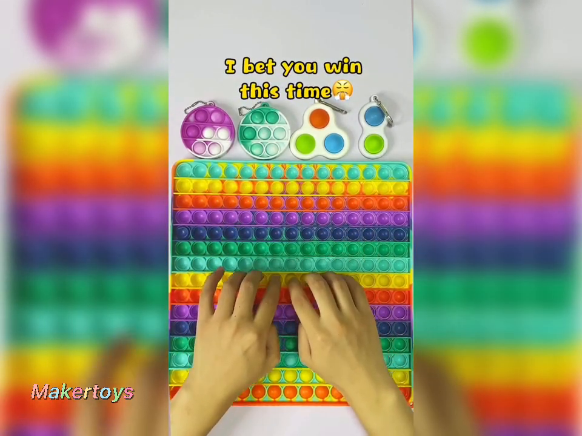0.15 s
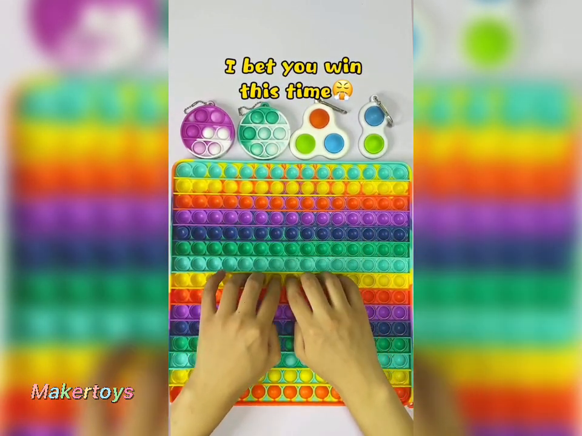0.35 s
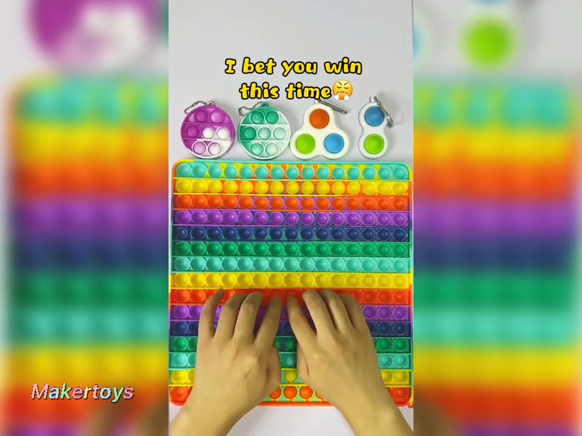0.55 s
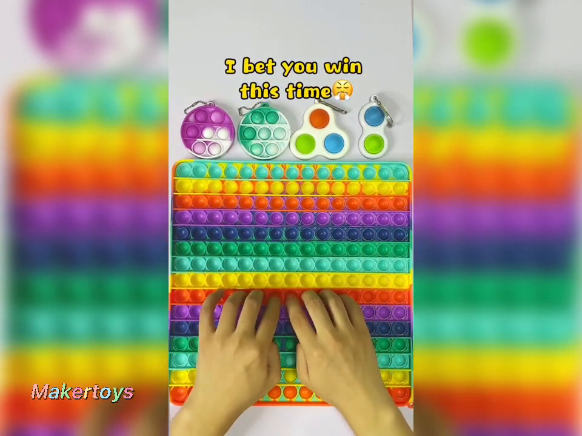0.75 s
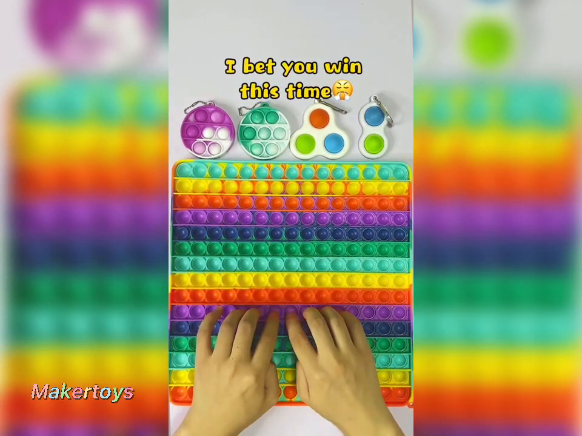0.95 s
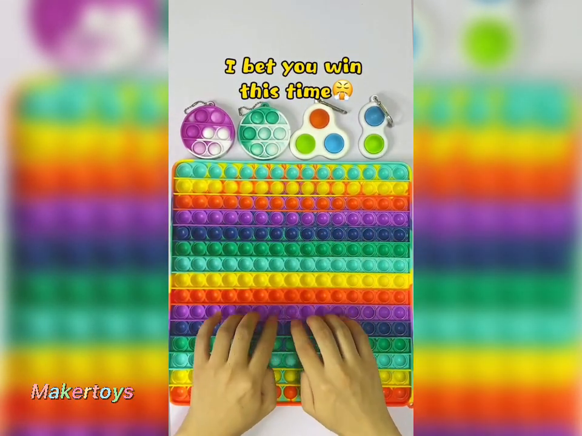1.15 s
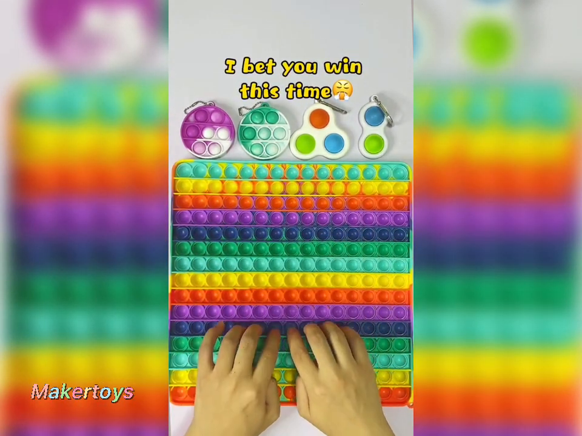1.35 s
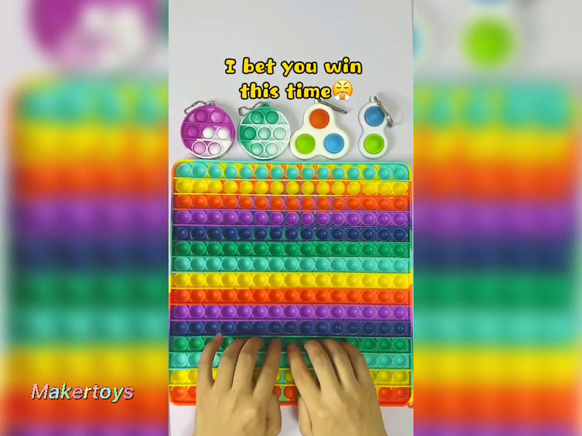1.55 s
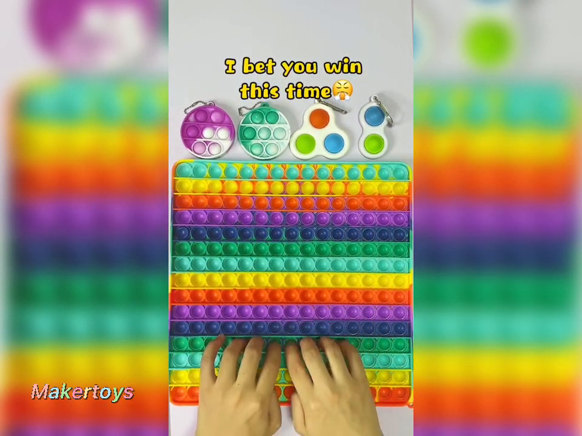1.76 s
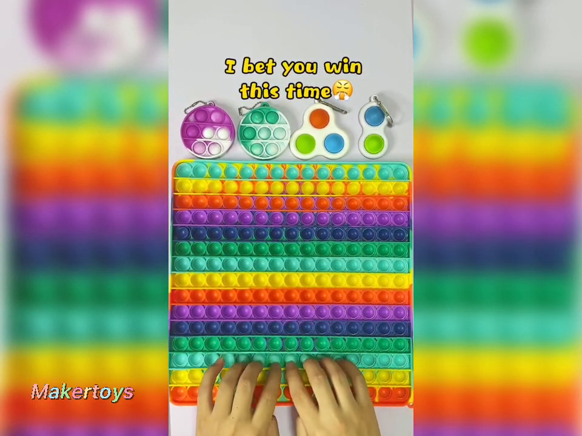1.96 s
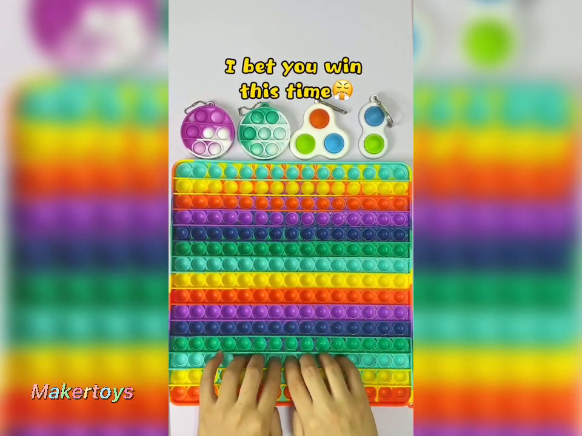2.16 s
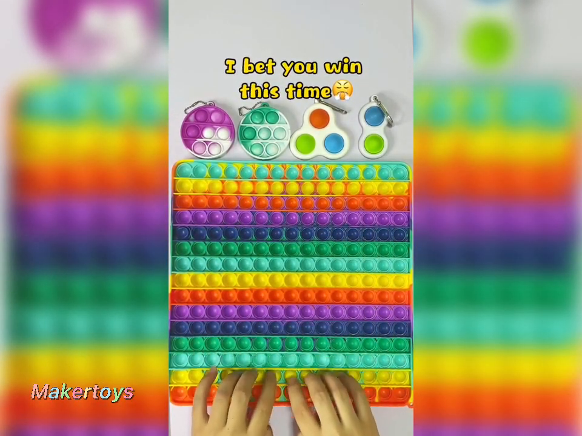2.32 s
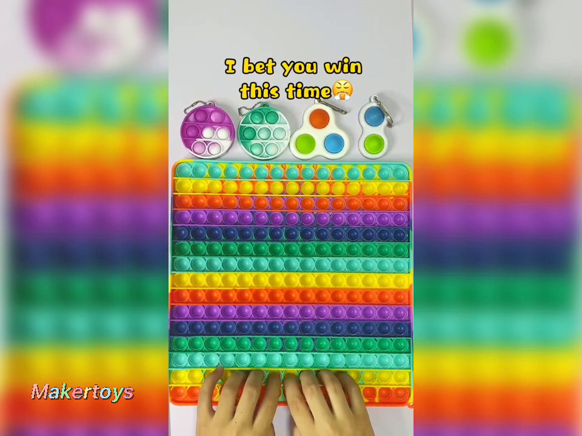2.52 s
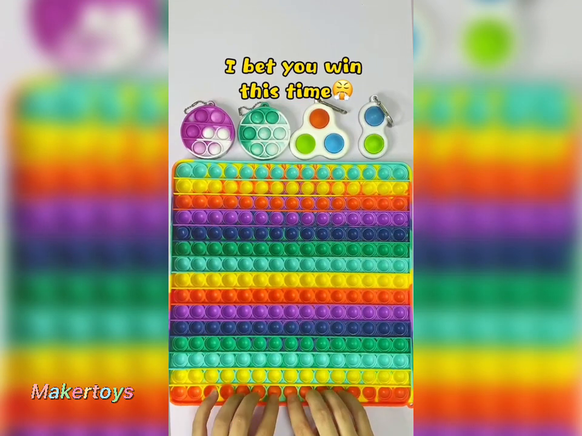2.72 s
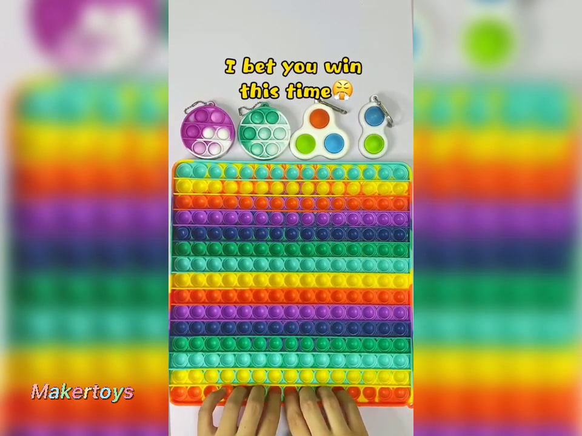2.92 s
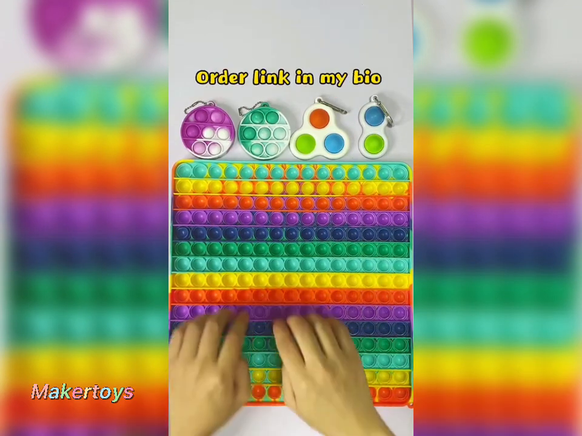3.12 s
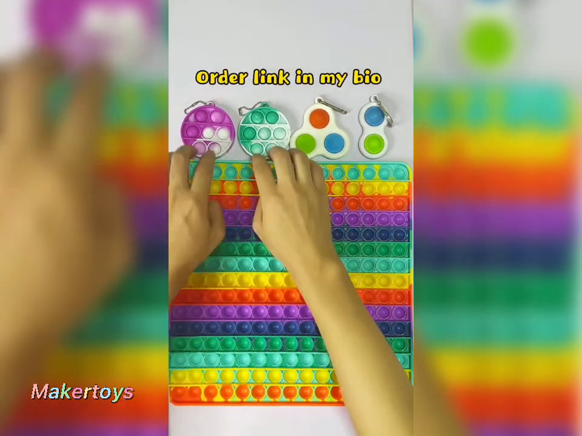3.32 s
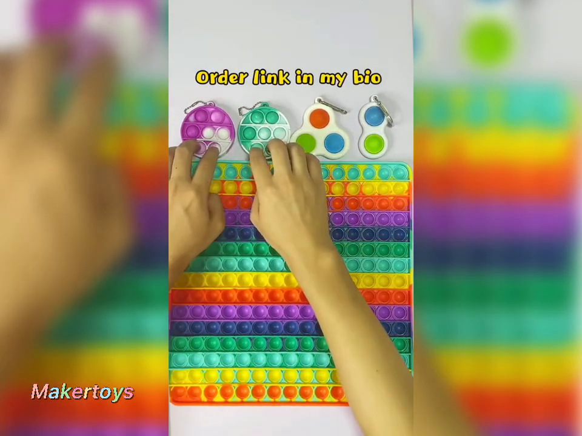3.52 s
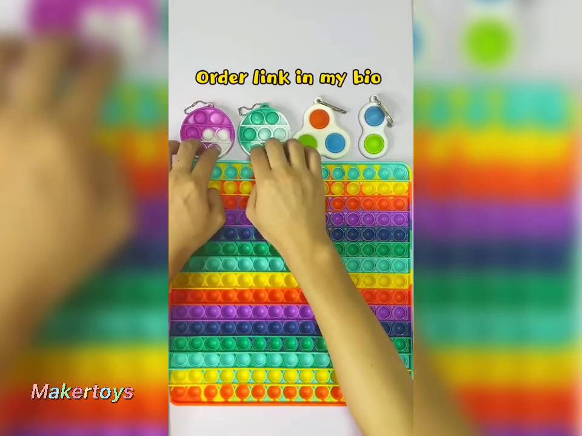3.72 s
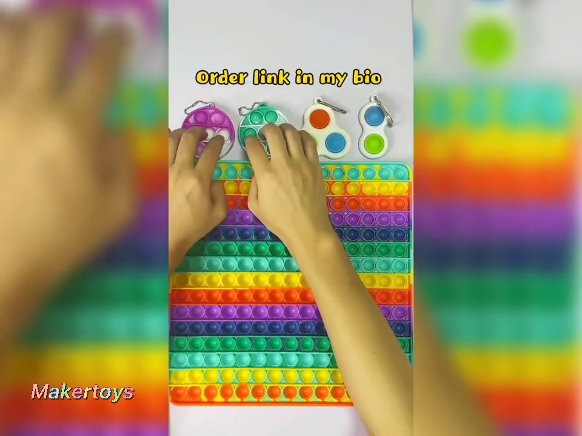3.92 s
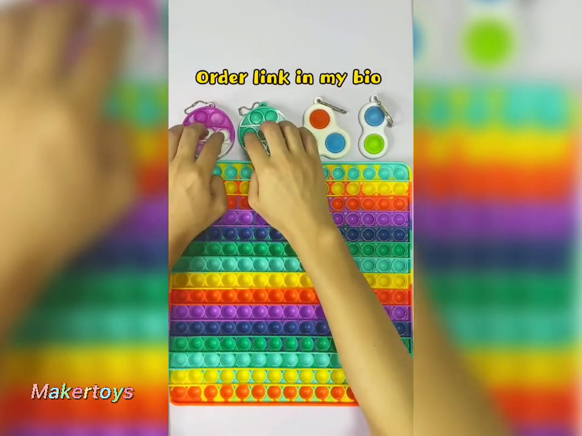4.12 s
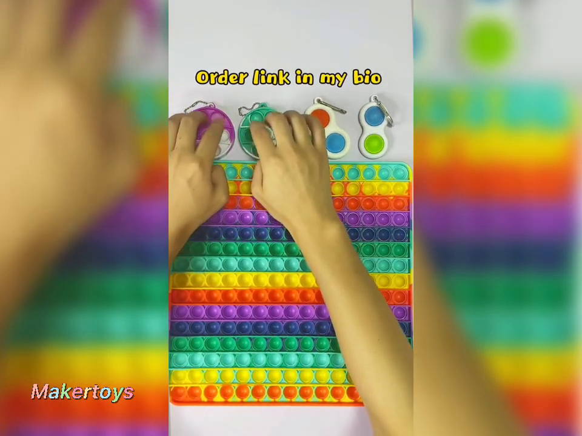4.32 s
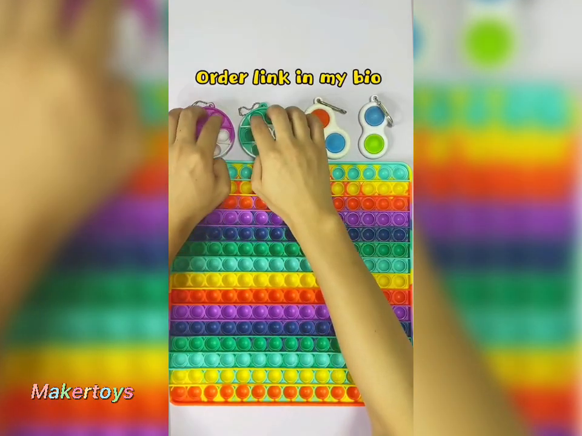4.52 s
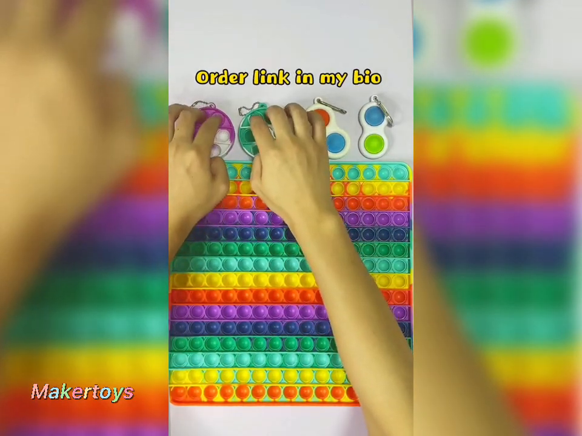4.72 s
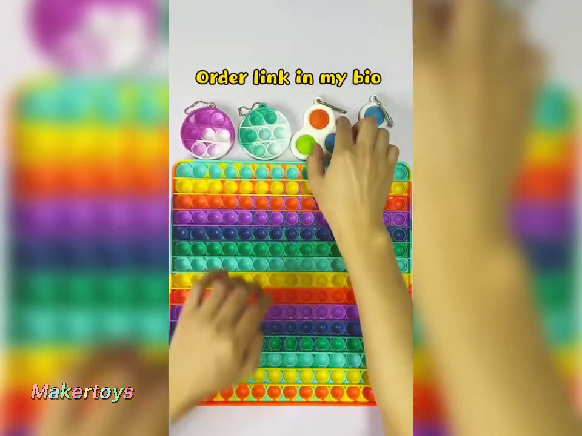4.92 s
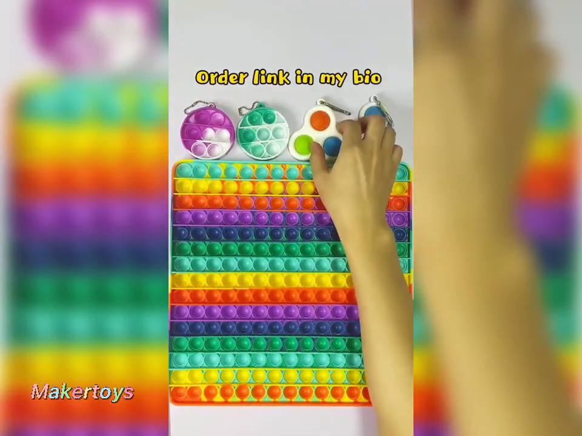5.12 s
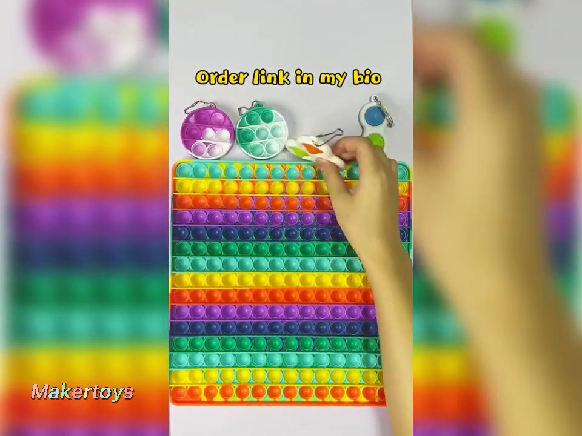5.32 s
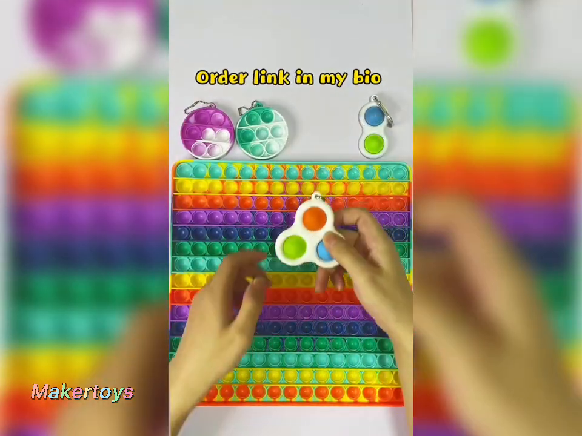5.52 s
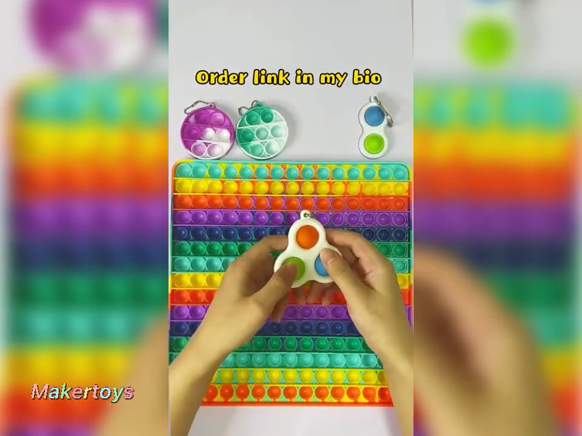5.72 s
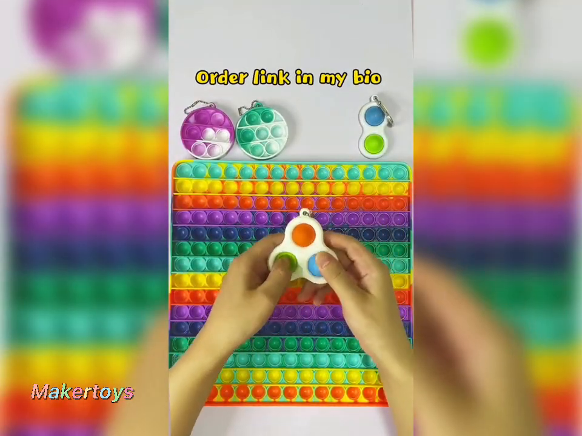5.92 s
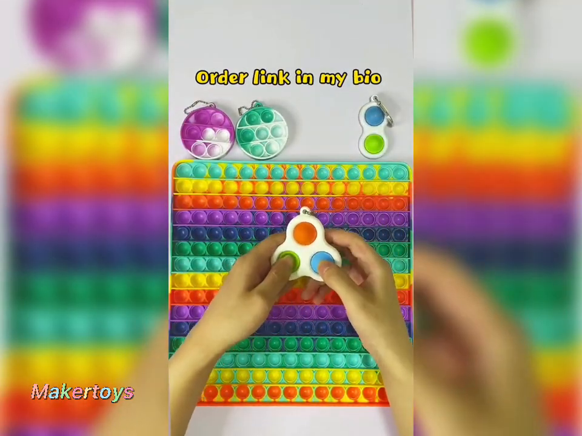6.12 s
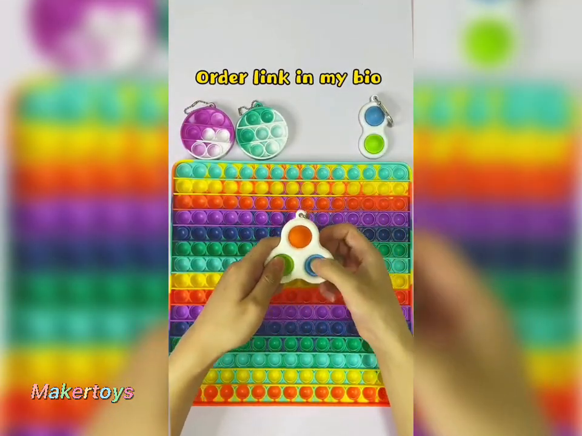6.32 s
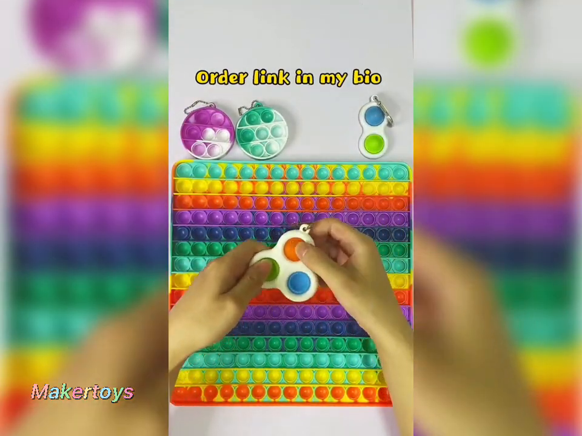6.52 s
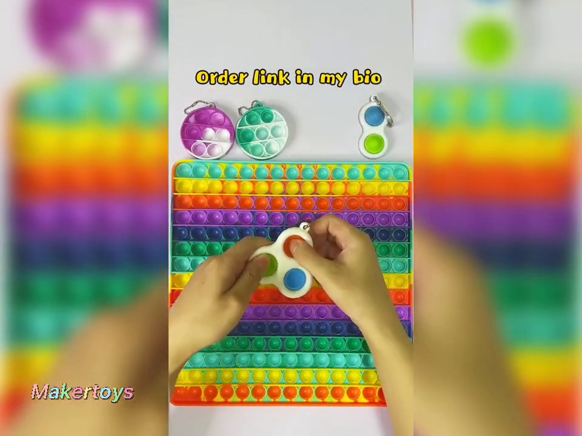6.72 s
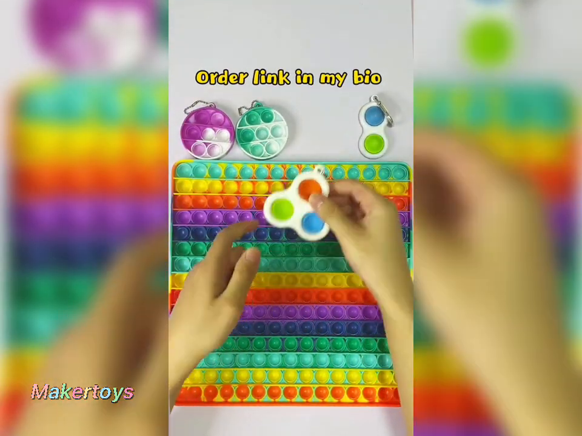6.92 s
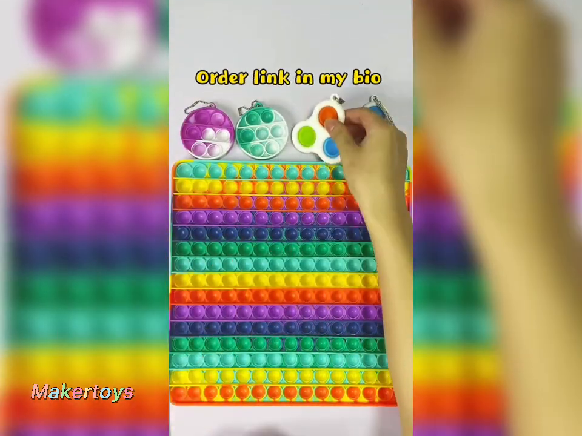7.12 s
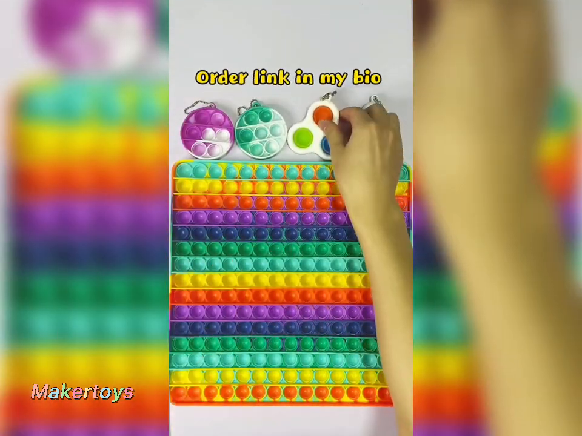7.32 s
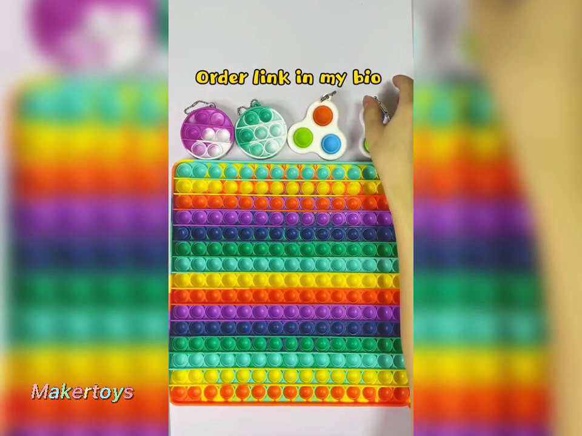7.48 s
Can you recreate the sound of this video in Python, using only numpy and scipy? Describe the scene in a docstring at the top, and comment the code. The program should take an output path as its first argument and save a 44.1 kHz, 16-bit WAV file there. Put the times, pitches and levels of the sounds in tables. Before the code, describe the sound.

Fingers press a bubble mat with loud crackling pops, move to smaller toys with thinner snaps, then rub and tick a plastic toy in a quiet room.

```python
"""A table in a small room: near hands press rows of silicone bubbles on a mat, then small pouches and a
plastic dimple toy, before a small microphone. Each press is a random burst of gliding dome snaps with skin
hiss; clear pops are single snaps with a crack of air. Decaying modes make the thuds of the table and the
ticks of the toy, shaped noise its rubbing. Dull room noise, a wavering hum and a low rumble lie under it."""
import sys
import numpy as np
from scipy import signal
from scipy.fft import rfft, irfft, next_fast_len
from scipy.io import wavfile
from scipy.ndimage import uniform_filter1d

SR = 44100
rng = np.random.default_rng(int(sys.argv[2]) if len(sys.argv) > 2 else 0)


def unload_audio(sound):
    """Save the sound as a 16-bit wav file, at the path given as the first command line argument."""
    columns = np.transpose(np.atleast_2d(sound))
    # keep every value between -1 and 1, then stretch to whole-number steps
    steps = np.round(np.clip(columns, -1, 1) * 32767)
    wavfile.write(sys.argv[1], SR, steps.astype(np.int16))


def gain_from_db(level_db):
    """Turn a decibel level (scalar or array-like) into a linear amplitude factor."""
    decades = np.asarray(level_db, float) / 20
    return 10 ** decades


N = 332952


def evened(x):
    """Scales to rms 1."""
    return x / np.sqrt(np.mean(x ** 2) + 1e-20)


def read(points, hz):
    """Reads a table along log frequency."""
    f, value = np.transpose(points)
    return np.interp(np.log(hz + 1), np.log(f + 1), value)


def add(mix, s, sound, pan_db=0):
    """Mixes a sound in at s seconds; positive pan_db leans left."""
    at = round(s * SR)
    sides = gain_from_db(np.array([[.5], [-.5]]) * pan_db)
    sound = (sound * sides)[:, max(-at, 0):]
    part = mix[:, max(at, 0):][:, :sound.shape[1]]
    part += sound[:, :part.shape[1]]


def noise(shape, same):
    """Two channels of noise, rms 1, with a gain over frequency and a given left-right likeness."""
    size = next_fast_len(N)
    hz = np.fft.rfftfreq(size, 1 / SR)
    left, other = rfft(rng.standard_normal((2, size)))
    same = np.clip(same(hz), -1, 1)
    right = same * left + np.sqrt(1 - same ** 2) * other
    return evened(irfft(np.array([left, right]) * shape(hz), size)[:, :N])


def grainy(db, count):
    """A gain that flickers by db (rms), smoothed over count samples."""
    return gain_from_db(db * evened(uniform_filter1d(rng.standard_normal(N), count)))


def swell(s, length, rise_db_ms, fall_db_ms):
    """Gain that climbs to a plateau at s and sinks after length seconds, straight in dB."""
    span = slice(max(round((s - .05) * SR), 0), round((s + length + .1) * SR))
    ms = ((np.arange(N) / SR - s) * 1000)[span]
    rise = np.minimum(rise_db_ms * ms, 0)
    fall = fall_db_ms * np.maximum(ms - length * 1000, 0)
    return span, gain_from_db(rise - fall)


# Spectrum of the room noise: pitch_hz [Hz], level_db [relative dB per Hz]
FLOOR_SPECTRUM = [(60, -49.5), (100, -13.5), (150, -8.5), (250, -14), (365, -19), (500, -26), (950, -30.5),
                  (1100, -31), (2400, -45.5), (3800, -50.5), (9000, -58.5), (12000, -66.5), (14500, -80)]
# Spread of the room noise: pitch_hz [Hz], left-right likeness [0-1]
FLOOR_LIKENESS = [(60, 0.69), (240, 0.94), (950, 0.52), (3770, 0.11), (15000, 0.87)]


def room_noise():
    """Steady dull noise of the place, with a left-right likeness that varies over frequency."""
    return gain_from_db(-59.5) * noise(lambda hz: gain_from_db(read(FLOOR_SPECTRUM, hz)), lambda hz: read(FLOOR_LIKENESS, hz))


# The hum swells and fades: start_s [s], level_db [dB rms before the flicker]
HUM_SWELLS = [(0.0, -54), (0.25, -59.5), (0.65, -50), (0.9, -64), (1.2, -60), (1.9, -68), (2.04, -52.5),
              (2.3, -54), (2.69, -73), (3.15, -54), (3.45, -67), (3.55, -50), (3.85, -64), (4.0, -57),
              (4.26, -70.5), (4.37, -50.5), (4.55, -61.5), (4.93, -50.5), (5.22, -62.5), (5.47, -46.5),
              (5.95, -54.5), (6.1, -61.5), (6.8, -57.5), (6.97, -68), (7.55, -56)]
# Fainter, fuzzy tones above the hum: pitch_hz [Hz], width_hz [Hz], level_db [relative dB]
FUZZY_TONES = [(200, 21, -0.5), (237.6, 8.8, 1.5)]


def hum():
    """A sine whose pitch drifts and level wavers, under noise narrowed to fuzzy tones."""
    drift_hz = 4.3 * evened(uniform_filter1d(rng.standard_normal(N), 3000))
    tone = np.sqrt(2) * np.sin(2 * np.pi * np.cumsum(148 + drift_hz) / SR)  # around 148 Hz, rms 1
    tone = tone * gain_from_db(np.interp(np.arange(N) / SR, *np.transpose(HUM_SWELLS)))
    fuzz = noise(lambda hz: sum(gain_from_db(db) / (1 + (2 * (hz - f) / width) ** 2) for f, width, db in FUZZY_TONES),
                 lambda hz: .9)
    return tone * grainy(2.5, count=3000) + gain_from_db(-65.5) * fuzz * grainy(3.3, count=6000)


# Spectrum of the rumble: pitch_hz [Hz], level_db [relative dB per Hz]
RUMBLE_SPECTRUM = [(15, -22), (30, 7), (60, 6), (85, 3), (110, -6.5), (160, -55.5)]
# The rumble dips, then grows: start_s [s], level_db [dB before the flicker]
RUMBLE_SWELLS = [(0, -62), (1.2, -58.5), (1.55, -68), (2.7, -60), (3.25, -61), (4.1, -62), (4.5, -52.5),
                 (7.55, -55)]


def rumble():
    """Flickering bass noise, louder towards the end."""
    bass = noise(lambda hz: gain_from_db(read(RUMBLE_SPECTRUM, hz)), lambda hz: .85) * grainy(5.6, count=4000)
    return bass * gain_from_db(np.interp(np.arange(N) / SR, *np.transpose(RUMBLE_SWELLS)))


# Spectrum of skin on silicone: pitch_hz [Hz], level_db [relative dB per Hz]
SKIN_SPECTRUM = [(1470, -12.5), (2500, -3), (2850, -4.5), (3230, -5.5), (3660, -9.5), (5870, -10),
                 (7590, -16), (10700, -20.5), (16000, -33.5)]
# Spread of the skin hiss: pitch_hz [Hz], left-right likeness [0-1]
SKIN_LIKENESS = [(2000, 0.99), (4500, 0.91), (9000, 0.65), (14000, 1)]


def skin_hiss():
    """Noise with the colour of skin on silicone; also the air of the cracks."""
    return noise(lambda hz: gain_from_db(read(SKIN_SPECTRUM, hz)), lambda hz: read(SKIN_LIKENESS, hz))


def snap(hz, cycles, glide, phase=0):
    """A dome buckles: a few cycles that slide down as the shell settles; the peak lies at sample 300."""
    u = (np.arange(900) - 300) / SR * np.reshape(hz, (-1, 1))  # time in cycles
    turns = (1 - np.exp(-glide * np.clip(u, -3, 9))) / glide
    shape = np.where(u < 0, np.exp(-(u / (.5 * cycles)) ** 2), np.exp(-u / cycles))
    return shape * np.cos(2 * np.pi * (turns + np.reshape(phase, (-1, 1))))


# Presses of the fingers: start_s [s], length_s [s], level_db [dB before the cavities],
# pitch_hz of the domes [Hz], pan_db [dB left over right]
FINGER_PRESSES = [(0.0, 0.0084, -18, 970, -0.5), (0.336, .018, -14.5, 825, 3), (0.695, 0.019, -20, 755, 5),
                  (1.034, 0.031, -16.5, 811, 1.5), (1.381, 0.025, -17, 810, 3),
                  (1.722, 0.027, -14, 887, 1.5), (2.108, 0.019, -20, 822, 0.5),
                  (2.474, 0.026, -22, 805, 4.5), (2.827, 0.017, -26, 851, -2.5),
                  (3.652, 0.02, -31, 1200, 0), (4.105, .016, -28, 1603, -0.5),
                  (4.13, .014, -35.5, 1314, 2.5), (4.577, .024, -27, 2140, 3), (5.875, 0.017, -29, 1983, 3),
                  (6.211, 0.018, -28.5, 2060, 3.5), (6.253, 0.0074, -44, 2030, -1),
                  (6.583, 0.033, -34.5, 1880, 2.5), (6.626, 0.014, -44.5, 1600, 0)]
# What is pressed, from the time the hands reach it: start_s [s],
# hiss_db [dB against the press, before the trim in presses()], pitch spread [octaves]
PRESSED_TOYS = [(0, -13, 1.37), (3.3, -13, 1.36), (4.3, -9.5, 0.59), (5.8, -15.5, 1), (6.1, -4, 1.06)]


def lean_db(s):
    """Left-right balance of the hands at time s, carried from press to press."""
    return np.interp(s, *np.transpose(FINGER_PRESSES)[[0, 4]])


def presses():
    """Under the finger pads many domes creak and give way at random; skin hisses on the silicone."""
    out = np.zeros((2, N))
    hiss = skin_hiss() * grainy(1.1, count=70)
    draws = rng.random((len(FINGER_PRESSES), 6, 160))  # 160 snaps a press
    for (s, length, db, hz, pan_db), (when, up, down, phase, side, size) in zip(FINGER_PRESSES, draws):
        hiss_db, spread = [toy[1:] for toy in PRESSED_TOYS if toy[0] <= s][-1]
        span, gain = swell(s, length, rise_db_ms=2.5, fall_db_ms=1.33)
        # the domes strain before they give
        creak_span, creak = swell(s - .011, .011, rise_db_ms=1.87, fall_db_ms=0.4)
        samples = np.arange(span.start, span.stop)
        creak = np.interp(samples, np.arange(creak_span.start, creak_span.stop), creak)
        gain = np.maximum(gain, gain_from_db(-14.5) * creak)

        at = (when * len(gain)).astype(int)
        late_s = np.clip((at + span.start) / SR - s, -.02, .05)
        octaves = spread * (up - 1.2 * down - 7.1 * late_s)  # pitch sinks as the domes flatten
        sizes = gain[at] * gain_from_db(-10 * size)  # few large, many small
        domes = snap(hz * 2 ** octaves, cycles=1.41 / max(spread, .3), glide=0.11, phase=phase)
        for k, dome, lean in zip(at, sizes[:, None] * domes, side):
            add(out, (span.start + k - 300) / SR, gain_from_db(db) * dome[None], pan_db + 6. * (lean - .5))

        # the skin hiss dies away while the fingers still press
        held_ms = np.clip(samples / SR - s, 0, length) * 1000
        hiss_gain = gain_from_db(db + hiss_db + 2.5 - 0.1048 * held_ms) * gain
        add(out, span.start / SR, hiss_gain * hiss[:, span], .2 * pan_db)
    return out


# Domes that snap clearly: start_s [s], level_db of the dome [dB before the cavities], pitch_hz [Hz],
# crack_db [dB against the dome], glide [downward per cycle, held to 0.03-0.75 in pops()]
CLEAR_SNAPS = [(0.002, -19.5, 930, -8, 0.38), (0.3396, -8.5, 940, -25, 0.37),
               (0.3435, -6.5, 784, -26, 0.31), (0.3515, -14, 795, -14.5, 0.17),
               (0.6989, -9.5, 708, -34, 0.41), (0.7101, -9.5, 954, -37, 0.73),
               (1.0426, -3.5, 807, -27.5, 0.54), (1.0521, -8, 1040, -26, 0.61),
               (1.0631, -13.5, 700, -22, 0.33), (1.3933, -8.5, 990, -13.5, 0.47),
               (1.4027, -14, 800, -23.5, 0.24), (1.7167, -24, 850, -22.5, .12),
               (1.7271, -10, 816, -29.5, 0.36), (1.7354, -6.5, 1045, -15.5, 0.29),
               (1.7489, -12.5, 610, -24.5, 0.66), (2.1089, -9, 1004, -12, 0.17),
               (2.1143, -7.5, 785, -14, 0.23), (2.1198, -18.5, 575, -26, 0.19),
               (2.4829, -10.5, 820, -29, 0.47), (2.4936, -23, 942, -5, .3), (2.8365, -34, 690, -22.5, 0.35),
               (2.8424, -16.5, 934, -26.5, 0.38), (3.654, -27, 843, -24.5, 0.33),
               (3.6645, -19.5, 1290, -19, 0.24), (3.672, -23.5, 1420, -17, 0.12),
               (3.6805, -28.5, 1354, -9, 0.42), (4.1171, -10, 1552, -15, 0.9),
               (4.1387, -16, 1150, -12.5, 0.26), (4.5799, -24.5, 1750, -33, 0.14),
               (4.5831, -20, 2260, -27, .038), (4.5865, -23, 2200, -21.5, 0.21),
               (4.5942, -18, 2130, -21, 0.1), (5.8924, -15, 1560, -15, 1), (6.2687, -23.5, 2100, 1.5, 0.36),
               (6.6025, -18, 1880, -6.5, 0.38), (6.6427, -26.5, 1630, -5, 0.35)]


def pops():
    """Single domes snap through, each with a short crack of air; the less one glides, the longer it rings."""
    out, air = np.zeros((2, N)), skin_hiss()
    t = (np.arange(900) - 300) / SR
    crack_shape = np.exp(-abs(t) / np.where(t < 0, .0007, .002))
    for s, db, hz, crack_db, glide in CLEAR_SNAPS:
        glide = np.clip(glide, .03, .75)
        at = max(round(s * SR) - 300, 0)
        crack = air[:, at:at + 900] * crack_shape
        dome = snap(hz, .85 + .1 / glide, glide)
        add(out, s - 300 / SR, gain_from_db(db) * (dome + gain_from_db(crack_db) * crack), lean_db(s))
    return out


# Pushes into the table: start_s [s], level_db [peak dB of the low modes],
# pitch_hz that the spot favours [Hz], upper_db of the upper modes [dB against that peak]
TABLE_PUSHES = [(0.002, -28.5, 121, -8), (0.332, -31, 110, 4.5), (0.695, -34, 133.3, 4.5),
                (1.035, -33, 127.4, 6), (1.129, -42.5, 139, -18.5), (1.39, -41, 62, 7),
                (1.739, -24, 94, -4), (2.108, -35.5, 124, 2), (2.469, -36.5, 148, -0.5),
                (2.817, -47, 151, 3), (3.655, -31, 130, -14.5), (3.891, -52, 89.6, -22),
                (4.118, -35.5, 138.5, -4), (4.136, -32.5, 126, -13), (4.573, -40.5, 161, 6.5),
                (5.208, -50.5, 62, 2), (5.889, -48.5, 140, 7.5), (6.21, -49, 60.6, 7),
                (6.596, -42.5, 62, -7), (7.118, -43, 115, -7.5), (7.222, -48.5, 200, -14.5),
                (7.52, -42, 117, -23)]
# Low modes of the table top: pitch_hz [Hz, after the sag], level_db [relative dB], t60_s [s]
LOW_MODES = [(63, -1, .14), (94, 0, 0.18), (117, 0.5, .17), (130, -1, 0.14), (155, 0.5, 0.18),
             (222, -0.5, 0.16)]
# Upper modes of the table top: pitch_hz [Hz, after the sag], level_db [relative dB], t60_s [s]
UPPER_MODES = [(420, -3.5, 0.18), (548, -5, 0.19)]


def thuds():
    """The table top answers each push with dull modes that sag in pitch; the spot decides which low modes sound."""
    out, t = np.zeros((2, N)), np.arange(SR // 4) / SR
    sagging_t = t + .004 * (1 - np.exp(-t / 0.019))
    rise = (1 - np.exp(-t / 0.0047)) ** 2

    def mode(hz, db, t60):
        return gain_from_db(db - 60 * t / t60) * np.sin(2 * np.pi * hz * sagging_t)

    upper = rise * sum(mode(*row) for row in UPPER_MODES)
    for s, db, spot_hz, upper_db in TABLE_PUSHES:
        # a push spreads 0.34 octaves over the low modes
        low = rise * sum((0.1 + np.exp(-(np.log2(row[0] / spot_hz) / 0.34) ** 2)) * mode(*row)
                         for row in LOW_MODES)
        thud = low / abs(low).max() + gain_from_db(upper_db) * upper
        add(out, s, gain_from_db(db) * thud[None], lean_db(s))
    return out


# Spectrum of skin sliding on the toy: pitch_hz [Hz], level_db [relative dB per Hz]
SLIDE_SPECTRUM = [(1060, -56), (1800, -15), (2980, -4.5), (3320, -12.5), (5340, -1.5), (5800, -9.5),
                  (11200, -26.5), (15000, -29.5), (16000, -30)]


def slide_hiss(likeness):
    """Noise with the colour of skin sliding on plastic."""
    return noise(lambda hz: gain_from_db(read(SLIDE_SPECTRUM, hz)), lambda hz: likeness)


# Hard contacts: start_s [s], knock pitch_hz [Hz], then level_db [dB] of the knock,
# of the ring of the plastic and of the click
HARD_CONTACTS = [(1.1299, 458, -42.5, -60.5, -48), (2.5652, 533, -61.5, -61, -48.5),
                 (3.4021, 401, -65, -68, -72.5), (3.4104, 401, -65, -65, -81.5),
                 (4.6961, 477, -77.5, -80, -53), (4.9077, 544, -46.5, -71, -78),
                 (5.026, 400, -71.5, -62, -65), (5.072, 404, -58, -64, -59.5),
                 (5.1031, 427, -43.5, -38, -37.5), (5.2061, 397, -69.5, -70, -43),
                 (5.4544, 419, -63, -71.5, -72), (5.5672, 710, -51, -47, -45.5),
                 (5.6537, 397, -62, -62.5, -75), (5.7304, 436, -63, -55, -54),
                 (5.8221, 441, -49, -57.5, -64), (6.0338, 469, -63.5, -61.5, -53.5),
                 (6.324, 1460, -34, -40, -50), (6.3444, 1500, -36, -41.5, -50),
                 (6.3777, 1500, -80, -77, -38), (6.504, 441, -53.5, -80.5, -75),
                 (6.7006, 427, -48, -70, -58), (6.7816, 1400, -66, -56, -58),
                 (7.0135, 401, -57.5, -61.5, -80), (7.1383, 1630, -43.5, -52.5, -55.5),
                 (7.1506, 2170, -23, -71, -59), (7.1677, 1580, -41, -62, -62),
                 (7.1993, 463, -42.5, -61, -70), (7.2545, 483, -27, -37, -26.5),
                 (7.2617, 510, -28, -42, -43), (7.3392, 2050, -32.5, -47.5, -44.5),
                 (7.5228, 2250, -37, -69, -49)]
# Modes of the plastic frame, also rung by rubs(): pitch_hz [Hz], level_db [relative dB], t60_s [s]
PLASTIC_MODES = [(1520, -4, .018), (2970, 0, .022), (3800, -8, .014), (4820, -2, .022), (6400, -14, .012),
                 (8600, -18, .012)]


def ticks():
    """A hard contact makes a click and a dull knock, and may ring the plastic frame."""
    out, t = np.zeros((2, N)), np.arange(3000) / SR
    draws = rng.standard_normal((len(HARD_CONTACTS), len(PLASTIC_MODES), 2))
    clicks = slide_hiss(.95)
    for (s, knock_hz, knock_db, ring_db, click_db), draw in zip(HARD_CONTACTS, draws):
        # each contact shifts the modes a little in level and pitch
        ring = sum(gain_from_db(db + 1.45 * a - 60 * t / t60) * np.sin(2 * np.pi * hz * (1 + 0.021 * b) * t)
                   for (hz, db, t60), (a, b) in zip(PLASTIC_MODES, draw))
        knock = gain_from_db(knock_db - 60 * t * knock_hz / 11) * np.sin(2 * np.pi * knock_hz * t)  # t60: 11 cycles
        at = round(s * SR)
        click = clicks[:, at - 3000:at] * gain_from_db(click_db) * np.exp(-t / .0015)
        add(out, s, gain_from_db(ring_db) * ring + knock + click, lean_db(s))
    return out


def plastic_noise(modes):
    """Noise ringing in plastic modes; the faster a mode dies, the wider its peak."""
    return noise(lambda hz: sum(gain_from_db(db) / (1 + (2 * (hz - f) * t60 / 5.0) ** 2) for f, db, t60 in modes),
                 lambda hz: .9)


# Fingers sliding over the toy: start_s [s], length_s [s], level_db [dB before the flicker],
# share that rings the plastic [0-1], low_db of the low modes [dB against the level]
FINGER_SLIDES = [(4.905, 0.011, -77, 0.5, 12), (5.021, 0.038, -65.5, 0.2, -2.5),
                 (5.075, 0.065, -63.5, 0.24, 5), (5.145, 0.051, -72, 0.4, 1.5),
                 (5.201, 0.04, -59.5, 0.23, -9), (5.247, 0.048, -54, 0.25, -27),
                 (5.423, 0.02, -77, 0.73, -8), (5.46, 0.035, -63.5, 0.33, -0.5),
                 (5.518, 0.033, -79, 0.7, 7.5), (5.559, 0.025, -63.5, 0.6, -6),
                 (5.653, 0.031, -82, .8, 11.5), (5.723, 0.03, -67, 0.38, -6), (5.814, 0.035, -73.5, .7, -3),
                 (5.92, 0.018, -64, 1, 4), (6.022, 0.024, -71.5, 0.74, -1.5), (6.24, 0.051, -51, 0.6, -10),
                 (6.318, 0.063, -51.5, 0.16, -4), (6.496, 0.028, -81, 0.86, 9.5),
                 (6.642, 0.029, -57, 0.2, -15), (6.701, 0.0088, -53, 0.5, -5.5),
                 (6.778, 0.037, -54.5, 0.54, -1.5), (6.821, 0.035, -67.5, 0.46, -2),
                 (7.009, 0.023, -80, 0.8, 2.5), (7.124, 0.011, -65.5, 0.1, 5), (7.15, 0.022, -62, 0.07, 15),
                 (7.178, 0.033, -62.5, 0.17, 9.5), (7.221, 0.044, -61, 0.1, 0), (7.243, 0.045, -58, 0, 8),
                 (7.326, 0.03, -62, 0, 5.5), (7.513, 0.053, -64, 0.34, 0)]


def rubs():
    """Sliding skin makes a grainy hiss, part of which rings in the plastic; a loose grip frees the low modes."""
    out = np.zeros((2, N))
    hiss = slide_hiss(.9)
    low, high = plastic_noise(PLASTIC_MODES[:2]), plastic_noise(PLASTIC_MODES[2:])
    body = noise(lambda hz: 1 / abs(1 + 1j * 0.41 * (hz / 900 - 900 / (hz + 1))) ** 2, lambda hz: .9)
    fine = noise(lambda hz: 1 / (1 + (8000 / (hz + 1)) ** 6), lambda hz: .95)
    grain = grainy(1.8, count=150)
    for s, length, db, share, low_db in FINGER_SLIDES:
        span, gain = swell(s, length, rise_db_ms=3.0, fall_db_ms=4.5)
        share = np.clip(share, 0, 1)
        ring = high[:, span] + gain_from_db(low_db) * low[:, span]
        slide = hiss[:, span] + gain_from_db(low_db) * body[:, span]
        fine_db = -19 - 0.41 * low_db  # a firm grip (weak low modes) hisses finer
        rub = np.sqrt(1 - share) * slide + np.sqrt(share) * ring + gain_from_db(fine_db) * fine[:, span]
        out[:, span] += gain_from_db(db) * gain * grain[span] * rub
    return out


# Cavities of what is pressed, from the time the hands reach it:
# start_s [s], list of (pitch_hz [Hz], width_hz [Hz], level_db [dB over the direct sound])
TOY_CAVITIES = [(0, [(413, 80, 1.5), (560, 100, -6), (930, 200, 0.5), (1380, 390, 3.5), (2000, 200, 4.5),
                (5750, 700, -4.5)]), (3.3, [(521, 270, -2.5), (1050, 160, 5), (2250, 330, 1),
                (5000, 530, 2.5)]), (5.8, [(548, 320, 8), (1440, 610, -0.5), (2540, 200, 0),
                (3270, 320, -12), (6130, 400, 5.5), (14700, 7300, 2)])]


def cavities(x):
    """Each toy adds the ring of its hollows; small domes give off no deep bass."""
    size = next_fast_len(N)
    hz, t, out = np.fft.rfftfreq(size, 1 / SR), np.arange(N) / SR, np.zeros_like(x)
    ends = [s for s, modes in TOY_CAVITIES[1:]] + [np.inf]
    for (s, modes), end in zip(TOY_CAVITIES, ends):
        ring = 1 + sum(gain_from_db(db) / (1 + 2j * (hz - f) / width) for f, width, db in modes)
        pressed = x * ((t >= s) & (t < end))
        out += irfft(rfft(pressed, size) * ring, size)[:, :N]
    return gain_from_db(-4) * signal.sosfilt(signal.butter(3, 300, "high", fs=SR, output="sos"), out)


# Decay of the small room: pitch_hz [Hz], t60_s [s]
ROOM_DECAY = [(100, 0.74), (300, 0.1), (800, 0.14), (2000, 0.18), (5000, 0.17), (12000, 0.2)]


def room(x):
    """Sparse echoes of random sign, each band dying at its own speed."""
    taps = np.zeros((2, SR // 2))
    # one echo in every 20 samples
    at = np.arange(120, SR // 2 - 20, 20) + rng.integers(0, 20, (2, (SR // 2 - 121) // 20))
    np.put_along_axis(taps, at, rng.choice([-1., 1.], at.shape), 1)
    hz, t, bands = signal.stft(taps, SR, nperseg=256)
    decay = gain_from_db(-60 * t / read(ROOM_DECAY, hz)[:, None])
    tail = signal.istft(bands * decay, SR, nperseg=256)[1]
    return signal.oaconvolve(x.mean(0)[None], tail / np.linalg.norm(tail[0]), axes=1)[:, :N]


def scene():
    """Hands and toys in the room, with the thuds of the table, over noise, hum and rumble."""
    background = room_noise() + hum() + rumble()
    near = cavities(presses() + pops()) + ticks() + rubs()
    return near + gain_from_db(-8.0) * room(near) + thuds() + background


def low_pass(x):
    """Removes everything above the highest recorded frequency."""
    return signal.sosfilt(signal.butter(12, 16370, fs=SR, output="sos"), x)


def record(dry):
    """A small microphone that loses the deepest bass, then a band limit at 15850 Hz."""
    heard = signal.sosfilt(signal.butter(1, 20, "high", fs=SR, output="sos"), dry)
    band_limit = signal.firwin(301, 15850, window=("kaiser", 8), fs=SR)
    heard = signal.oaconvolve(heard, band_limit[None], "same", axes=1)
    return low_pass(heard)


dry = scene()
out = record(dry)
unload_audio(out)
```